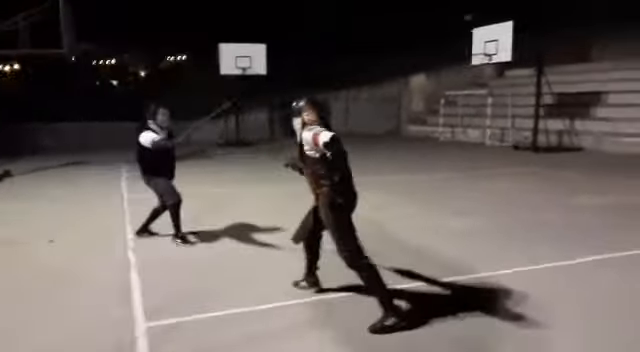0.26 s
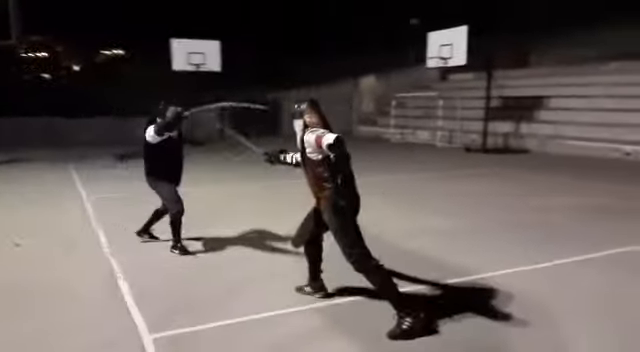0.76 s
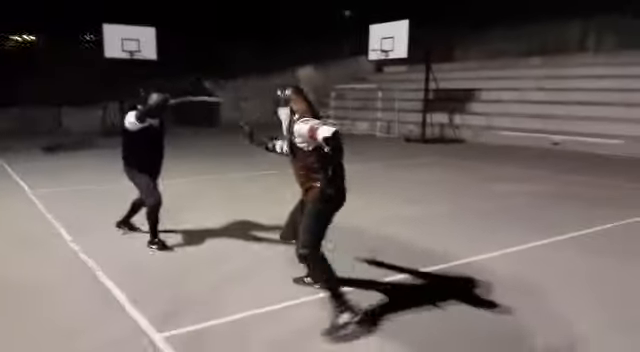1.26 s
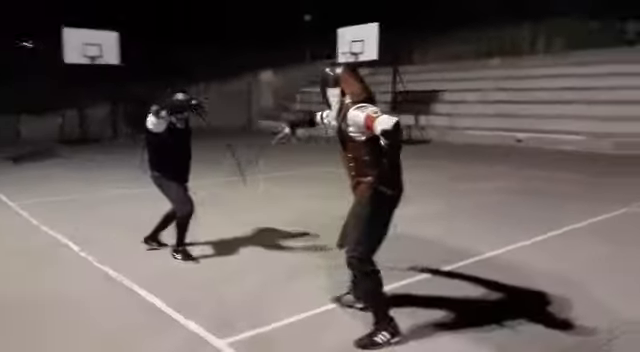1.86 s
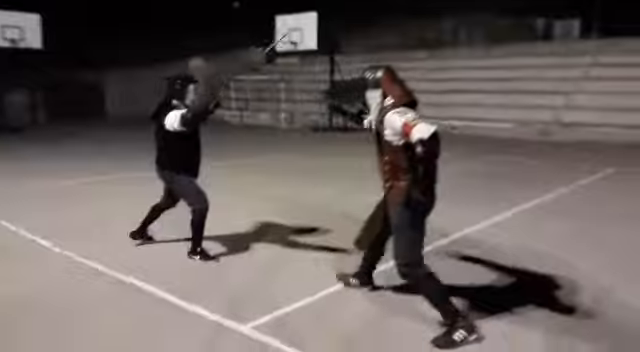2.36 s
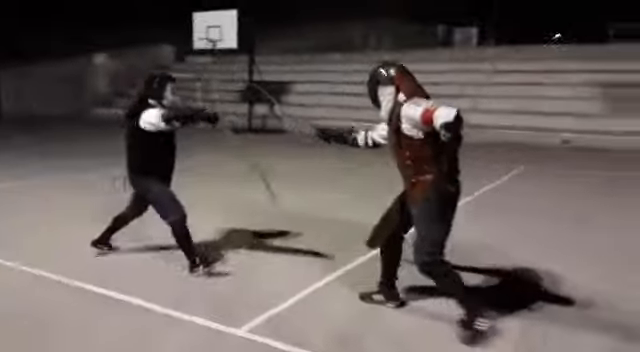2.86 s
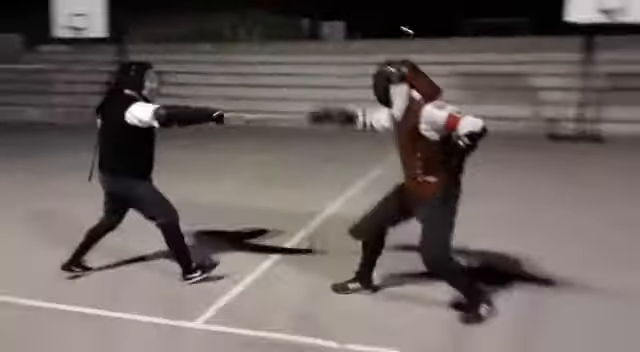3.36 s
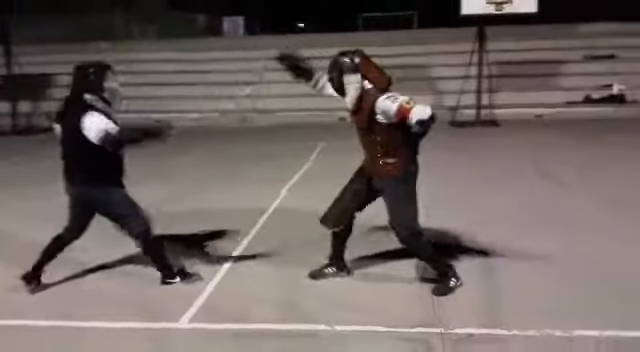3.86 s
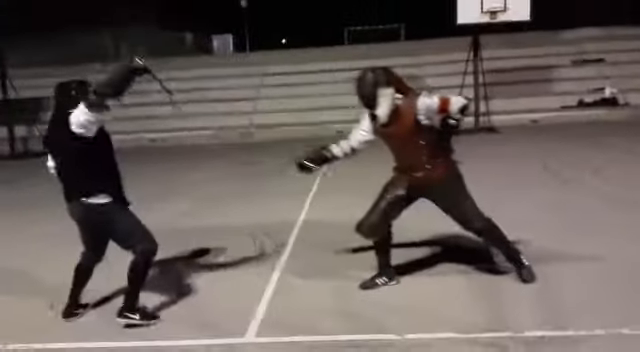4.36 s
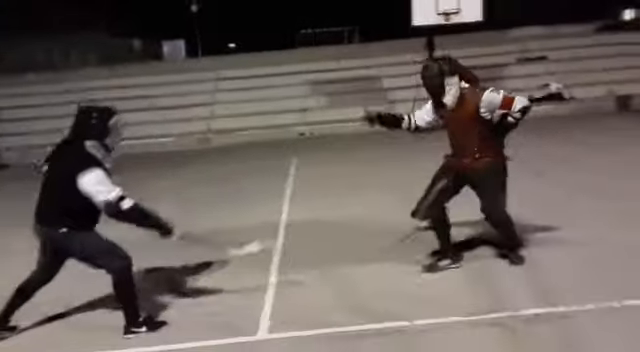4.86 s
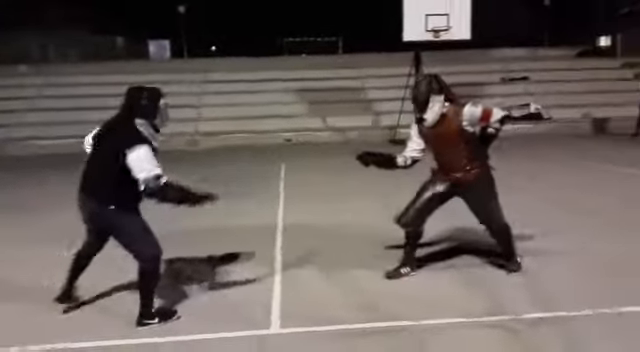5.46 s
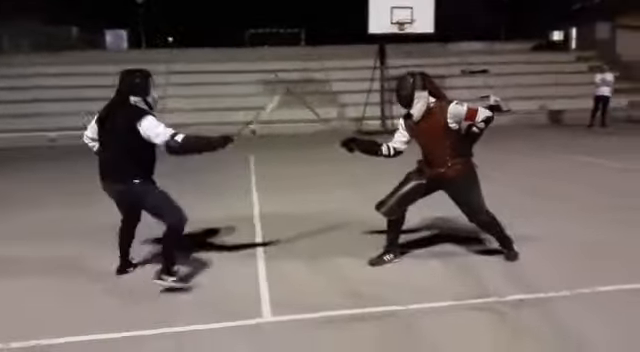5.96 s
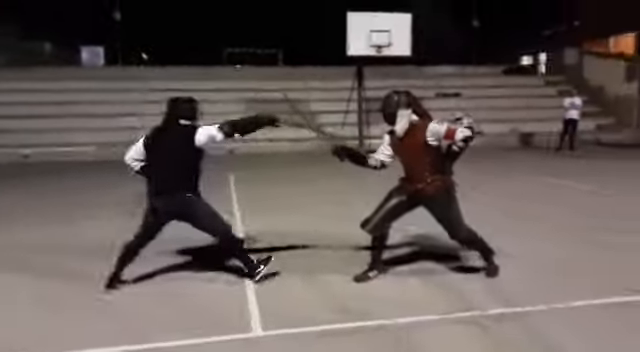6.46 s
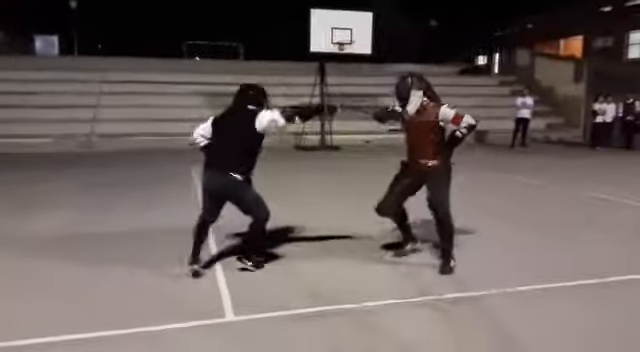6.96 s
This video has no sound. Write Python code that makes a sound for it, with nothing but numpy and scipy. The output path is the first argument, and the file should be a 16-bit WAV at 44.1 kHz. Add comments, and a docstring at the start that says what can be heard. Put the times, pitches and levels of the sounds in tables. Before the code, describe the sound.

Two steel sabres clash in bright ringing clinks and short scraping slides, with light shoe thuds on a concrete court at night.

```python
"""An outdoor concrete court at night: two fencers spar with steel sabres over a faint town rumble.
The blades clash and bounce as bursts of many damped modes, ring on in a few long ones, and slide as
tiny impacts that keep the steel ringing; squeals are wavering tones with overtones.
Shoes thud and slap, scrapes cross the ground, all as coloured noise; the concrete returns a thin tail.
The left microphone faces the blades and is limited and clipped on hard blows; the right one is shaded."""
import sys
import numpy as np
from scipy import signal
from scipy.fft import rfft, irfft, next_fast_len
from scipy.io import wavfile
from scipy.ndimage import uniform_filter1d, map_coordinates

SR = 44100
rng = np.random.default_rng(int(sys.argv[2]) if len(sys.argv) > 2 else 0)


def materialize(psi):
    """Save the field psi as 16-bit PCM at rate SR to the path in sys.argv[1].

    A 1-D psi becomes a single channel; in a 2-D psi each row is a channel.
    """
    bounded = np.clip(np.atleast_2d(psi).T, -1, 1)
    quanta = np.round(bounded * 32767).astype(np.int16)
    wavfile.write(sys.argv[1], SR, quanta)


N = 317520
TIME = np.arange(N) / SR
TOP_HZ = 14400  # upper band limit

# blows of blade on blade: t/s, clash level/dB, contacts in quick succession,
# ring level/dB, mode that the contact point favours f/Hz
BLOWS = [(1.395, -2, 2, -38, 6685), (1.463, -17, 1, -47, 6685), (1.614, -13, 1, -42, 5394),
         (1.868, -15, 1, -44, 7332), (2.2995, 4, 2, -34, 7332), (2.3715, -10, 1, -45, 7073),
         (2.539, -3, 1, -37, 8525), (2.654, -23, 1, -43, 5815), (3.126, 2, 1, -29, 5815),
         (3.201, -13, 1, -46, 7073), (3.519, -9, 1, -45, 5815), (3.6265, 6, 3, -41, 8525),
         (3.776, -13, 3, -46, 8040), (4.2035, 8, 2, -38, 5815), (4.339, -5, 1, -43, 8040),
         (5.1, -16, 1, -40, 6228), (5.691, 2, 1, -28, 5394), (5.853, -24, 1, -50, 7332),
         (5.956, -11, 1, -43, 7332), (6.232, -29, 1, -54, 3111), (6.634, -19, 1, -46, 6685),
         (6.716, -22, 1, -40, 3111)]
# long-ringing modes of the two sabres: f/Hz, relative level/dB, t60/s
SABRE_MODES = [(1200, -7, 0.2), (1668, -10, 0.5), (1810, -24, 0.2), (1995, -10, 0.71), (3111, -14, 0.21),
               (4190, -12.5, 0.45), (4530, -5.5, 0.17), (5394, 0.5, 0.42), (5815, -4, 0.65),
               (6685, 0.5, 0.32), (6570, -3, 0.55), (7073, -2, 0.45), (7360, 4, 0.15), (8040, -2, 0.21),
               (8500, 5.5, 0.12), (9571, -12.5, 0.31), (10100, -9.5, 0.24)]
# colour of steel scraping on steel: f/Hz, relative level/dB
SCRAPE_COLOUR = [(1000, -23.5), (2400, -12), (3200, -6.5), (4400, -8), (5500, 1), (6800, -1), (8500, -8.5),
                 (10000, -11.5), (11800, -24), (14000, -38.5)]
# colour of a dull thud, under blows and for slapping soles: f/Hz, relative level/dB
THUD_COLOUR = [(15, -30.5), (30, -14), (90, -4), (160, -2.5), (320, -4), (500, -9.5), (950, 3.5),
               (1800, -8.5), (4000, -24)]


def amp(db):
    """Decibels to gain."""
    return 10 ** (np.asarray(db) / 20)


def unit(x):
    """Scale to rms 1."""
    return x / np.sqrt(np.mean(x ** 2) + 1e-20)


def fade(t, t60):
    """Exponential decay by 60 dB in t60 seconds."""
    return np.exp(-np.log(1000) * t / np.maximum(t60, 1e-3))


def along(points, hz):
    """Read (Hz, value) points on a log frequency axis."""
    f, v = np.transpose(points)
    return np.interp(np.log(hz + 1), np.log(f + 1), v)


def filtered(x, response):
    """Apply a response, given as a function of frequency."""
    n = x.shape[-1]
    padded = next_fast_len(n + 4096)  # room for the filter's tail
    spectrum = rfft(x, padded) * response(np.fft.rfftfreq(padded, 1 / SR))
    return irfft(spectrum, padded)[..., :n]


def tinted(x, colour):
    """x with its spectrum shaped by the colour, at rms 1."""
    return unit(filtered(x, lambda hz: amp(along(colour, hz))))


def wobble(rate, n=N):
    """A smooth random curve with rate knots a second."""
    knots = rng.standard_normal(int(n * rate / SR) + 4)
    return map_coordinates(knots, [np.arange(n) * rate / SR])


def add(track, s, sound):
    """Mix a sound into the track at time s."""
    room = track[max(round(s * SR), 0):][:len(sound)]
    room += sound[:len(room)]


def patchy(x, depth_db, size=(3, 9)):
    """Small patches of the spectrum, size in bins and frames, swell and fade on their own."""
    z = signal.stft(x, nperseg=512)[2]
    across_bins = uniform_filter1d(rng.standard_normal(z.shape), size[0], 0)
    field = unit(uniform_filter1d(across_bins, size[1], 1))
    return unit(signal.istft(z * amp(depth_db * field), nperseg=512)[1][:len(x)])


def grains(rate):
    """Tiny random impacts of very unequal size, rate a second on average."""
    return unit((rng.random(N) < rate / SR) * rng.standard_normal(N))


def ringing(modes, t, scatter_db):
    """Damped modes; their strengths depend on where the blade is touched."""
    hz, db, t60 = np.transpose(modes)[:, :, None]
    gain = amp(db + scatter_db * rng.standard_normal(hz.shape))
    tones = np.sin(2 * np.pi * (hz * t + rng.random(hz.shape)))
    return np.sum(gain * fade(t, t60) * tones, 0)


def overtones(count=120):
    """The crowd of weaker bending and twisting modes of blades and guards (Hz)."""
    return np.linspace(1100, TOP_HZ, count) + rng.uniform(-55, 55, count)


def clashes(crowd, noise_share=1.0, rise_s=0.00096, focus_db=5, focus_hz=900):
    """Edges chatter for a moment, throwing all the modes into a burst that the grip soon damps."""
    # colour of the clashing edges: f/Hz, relative level/dB
    clash_colour = [(40, -60.5), (300, -50.5), (800, -15.5), (1200, -3.5), (1800, -8), (3200, -1),
                    (4400, -3), (5500, 2), (6800, 7.5), (8500, 1), (10000, -3), (11800, -7), (14000, -19.5)]
    rebound_s, rebound_loss_db = .013, 7.5  # the edges meet again after this time, weaker each time
    clash_t60_s, thud_t60_s = .08, 0.083
    thud_db, thud_grows = -24, 1.6  # low thud under a blow of 0 dB; its dB per dB of the blow
    t, out = TIME[:SR // 5], np.zeros(N)
    waves = np.exp(2j * np.pi * crowd[:, None] * t)
    attack = 1 - np.exp(-t / rise_s)
    contacts = [(s + k * rebound_s, db - k * rebound_loss_db, favoured)
                for s, db, count, _, favoured in BLOWS for k in range(round(count))]
    for s, db, favoured in contacts:
        # modes near the favoured one take most of the blow
        focus = amp(focus_db * np.exp(-((crowd - favoured) / focus_hz) ** 2))
        chance = rng.standard_normal(len(crowd)) + 1j * rng.standard_normal(len(crowd))
        modes = unit(((focus * chance) @ waves).real)
        burst = modes + noise_share * rng.standard_normal(len(t))
        add(out, s, amp(db) * tinted(burst, clash_colour) * attack * fade(t, clash_t60_s))
        # a dull low thud underneath, strongest in hard blows
        thud = tinted(rng.standard_normal(len(t)), THUD_COLOUR) * attack * fade(t, thud_t60_s)
        add(out, s, amp(thud_db + thud_grows * db) * thud)
    return out


def rings():
    """After each blow the sabres sing on, most of all in the mode that bends at the contact point."""
    # extra ring of the favoured mode; how far it reaches to neighbouring modes
    favour_db, favour_reach_hz = 14, 170
    t, out = TIME[:int(SR * .7)], np.zeros(N)
    for s, _, _, ring_db, favoured in BLOWS:
        modes = [(hz, db + favour_db * np.exp(-((hz - favoured) / favour_reach_hz) ** 2), t60)
                 for hz, db, t60 in SABRE_MODES]
        # each mode varies from blow to blow
        add(out, s, amp(ring_db) * ringing(modes, t, scatter_db=3.5))
    return out


def shimmer(flicker_db=4):
    """A few very high tones swell quickly and flicker as they die away."""
    # thin, very high tones that ring briefly: t/s, f/Hz, t60/s, level/dB
    high_tones = [(4.205, 12966, 0.19, -5), (4.205, 13800, 0.25, -29), (6.42, 13630, 0.93, -34),
                  (6.5, 12900, 0.43, -36)]
    t, out = TIME[:SR // 2], np.zeros(N)
    for s, hz, t60, db in high_tones:
        drift_hz = 12 * wobble(60, len(t))
        drift = 2 * np.pi * np.cumsum(drift_hz) / SR
        flicker = unit(amp(flicker_db * wobble(30, len(t))))
        tone = np.sin(2 * np.pi * hz * t + drift) * flicker
        add(out, s, amp(db) * signal.windows.tukey(len(t), .04) * fade(t, t60) * tone)
    return out


def pressure():
    """Gains of blade and guard: each slide bites, presses harder or eases off steadily, then lets go."""
    # edges that stay together and slide: t/s, length/s, first level/dB,
    # change of pressure along the way/dB, hand guard against blade/dB
    slide_contacts = [(1.442, 0.16, -23, -6, -18), (1.615, 0.24, -30.5, 7.5, -17),
                      (2.34, 0.2, -27.5, -8.5, -18), (2.552, 0.046, -23.5, -7.5, -11.5),
                      (2.61, 0.067, -35.5, -3.5, -3.5), (3.12, .22, -23.5, -15.5, -10),
                      (3.38, 0.15, -45, 11, 0), (3.67, 0.28, -23.5, -13, -16.5),
                      (4.236, 0.16, -19.5, -11, -14), (5.112, 0.22, -16, -23.5, -19.5),
                      (5.707, .19, -20.5, -16, -24.5), (5.948, 0.14, -32, 3, -11),
                      (6.21, .29, -40.5, 15, -9.5), (6.63, 0.29, -32, -4.5, -1.5),
                      (7.10, 0.14, -60.5, 5.5, 13)]
    bite_s, release_db_per_s = .012, 142  # how fast the edges catch; how fast they quieten once parted
    # guard dB per dB of pressure change; it fades as the contact runs toward the tip
    guard_follows, guard_sag_db_per_s = 1, 19.5
    blade, guard, t = np.zeros(N), np.zeros(N), TIME[:SR]
    for s, length, db, change_db, guard_db in slide_contacts:
        bite = 1 - np.exp(-t / bite_s)
        contact = bite * amp(db - release_db_per_s * np.maximum(t - length, 0))
        press_db = change_db * np.minimum(t / length, 1)
        add(blade, s, contact * amp(press_db))
        add(guard, s, contact * amp(guard_db + guard_follows * press_db - guard_sag_db_per_s * t))
    return blade, guard


def slide(crowd, song_db=-10, rasp_db=-5, judder_db=1.52):
    """Nicks in one edge catch on the other and keep the steel ringing."""
    # colour of the hand guards: f/Hz, relative level/dB
    guard_colour = [(200, -20.5), (500, -6), (800, -2), (1200, -2.5), (1450, -8), (1750, -6), (2200, -6),
                    (3000, -10), (6000, -26.5)]
    blade_gain, guard_gain = pressure()
    nicks, t = grains(rate=4000), TIME[:SR // 3]

    def excite(modes):
        """The nicks set these modes ringing."""
        return unit(signal.fftconvolve(nicks, ringing(modes, t, scatter_db=0))[:N])

    crowd_modes = [(hz, 0, .11) for hz in crowd]  # f/Hz, level/dB, t60/s
    steel = excite(crowd_modes) + amp(rasp_db) * nicks
    # as the contact point travels, neighbouring partials swell and fade
    steel = patchy(steel, depth_db=4)
    song = amp(song_db) * excite(SABRE_MODES)
    blade = unit(tinted(steel, SCRAPE_COLOUR) + song) * blade_gain
    guard = tinted(steel, guard_colour) * guard_gain
    return (blade + guard) * amp(judder_db * wobble(110))


def squeals(second_db=-6, third_db=-14, rasp=0.34):
    """Stick and slip lock briefly into an unsteady pitch that tends to rise."""
    # stick-slip squeals: t/s, middle pitch f/Hz, length/s, level/dB
    stick_slips = [(0.883, 2162, 0.075, -31.5), (1.928, 2740, 0.03, -37.5), (4.042, 3225, 0.1, -45.5),
                   (4.173, 1880, 0.036, -26.5), (4.168, 3650, 0.022, -28.5), (4.253, 1770, 0.012, -30),
                   (6.706, 3220, 0.035, -20.5), (6.713, 3304, 0.54, -70)]
    out = np.zeros(N)
    for s, hz, length, db in stick_slips:
        n = int(length * SR)
        waver_hz = 150 * wobble(700, n)
        pitch = hz * np.linspace(.975, 1.025, n) + waver_hz
        phase = 2 * np.pi * np.cumsum(pitch) / SR
        tone = np.sin(phase) + amp(second_db) * np.sin(2 * phase) + amp(third_db) * np.sin(3 * phase)
        rough = rasp * tinted(rng.standard_normal(n), SCRAPE_COLOUR)
        add(out, s, amp(db) * unit(np.hanning(n) * (tone + rough)))
    return out


def feet():
    """Soft soles thud on the court, with further shuffling steps between; a flat landing slaps."""
    # footfalls: t/s, level/dB
    footfalls = [(0.443, -42.5), (0.541, -40.5), (1.087, -39), (1.251, -41.5), (1.835, -43.5),
                 (2.903, -41.5), (3.264, -43.5), (4.067, -38.5), (4.115, -39), (4.808, -46), (5.078, -41),
                 (5.152, -44.5), (6.638, -43), (6.757, -34.5)]
    # dull slaps of soles and padding: t/s, level/dB
    dull_slaps = [(3.489, -33), (4.911, -47.5), (6.338, -43.5), (6.944, -40), (7.097, -40)]
    # colour of soft soles on concrete: f/Hz, relative level/dB
    sole_colour = [(25, -20.5), (80, -9.5), (200, 6), (320, -2), (500, -23), (1500, -21.5), (6000, -45.5)]
    # further steps at random moments, one in each gap, at a common level, once the footwork quickens
    shuffle_start_s, shuffle_gap_s, shuffle_db = 2.9, 0.33, -42.5
    t, out = TIME[:SR // 4], np.zeros(N)
    shuffle = [(s + shuffle_gap_s * rng.random(), shuffle_db)
               for s in np.arange(shuffle_start_s, N / SR, shuffle_gap_s)]
    step_shape = (1 - np.exp(-t / 0.0041)) * fade(t, 0.11)
    for s, db in footfalls + shuffle:
        add(out, s, amp(db) * tinted(rng.standard_normal(len(t)), sole_colour) * step_shape)
    for s, db in dull_slaps:
        add(out, s, amp(db) * tinted(rng.standard_normal(len(t)), THUD_COLOUR) * fade(t, 0.091))
    return out


def scuffs(fall_db=-6):
    """Grit is dragged over concrete; each stroke bites, then eases off."""
    # strokes of shoes or a blade tip scraping over concrete: t/s, length/s, level/dB
    ground_strokes = [(1.162, 0.065, -59.5), (1.24, 0.055, -65), (2.103, 0.099, -42), (2.856, 0.089, -39),
                      (4.765, 0.3, -38), (4.822, 0.045, -33.5), (7.082, 0.024, -41.5)]
    # colour of grit on concrete: f/Hz, relative level/dB
    grit_colour = [(200, -13), (700, -2), (2000, -4.5), (5000, 6.5), (6300, 5), (7700, 12), (10000, 0.5),
                   (14000, -14)]
    stroke = np.zeros(N)
    for s, length, db in ground_strokes:
        n = int(length * SR)
        easing = amp(db + fall_db * np.linspace(-.5, .5, n))
        add(stroke, s, easing * signal.windows.tukey(n, .45))
    grit = patchy(grains(rate=5800), depth_db=3.5)
    return stroke * tinted(grit, grit_colour) * amp(1.2 * wobble(84))


def taps():
    """Each tap is one short push of air, with a weaker pull after it and no ring."""
    # small dry taps close to the microphones: t/s, peak level/dB
    close_taps = [(1.355, -37.5), (4.7554, -23)]
    width_s = 0.00078  # from the peak to the zero crossing
    u, out = TIME[:SR // 100] / width_s, np.zeros(N)
    for s, db in close_taps:
        add(out, s, amp(db) * (1 - u) * np.exp(-u))
    return out


def court(x):
    """The concrete stands return a thin, diffuse tail."""
    # reverberation of the court: f/Hz, t60/s
    court_decay = [(150, 0.76), (2000, 0.76), (7000, 0.79), (14000, 0.12)]
    hz, t, z = signal.stft(rng.standard_normal((2, SR)), SR, nperseg=256)
    build_up = 1 - np.exp(-t / 0.066)
    decaying = z * fade(t, along(court_decay, hz)[:, None]) * build_up
    tail = signal.istft(decaying, SR, nperseg=256)[1]
    return signal.fftconvolve(x[None], tail / np.linalg.norm(tail[0]), axes=1)[:, :N]


def town():
    """A low, slowly drifting rumble of coloured noise, nearly the same on both sides."""
    # colour of the distant town: f/Hz, relative level/dB
    town_colour = [(15, -52), (25, -14.5), (118, 0), (154, -4.5), (237, -15.5), (1000, -17.5),
                   (2430, -27.5), (13800, -38.5), (15000, -56)]
    noise = rng.standard_normal(N) + 0.16 * rng.standard_normal((2, N))
    return amp(-61 + 0.92 * wobble(1.4)) * tinted(noise, town_colour)


def microphones(x, lag_s=0.00063, scatter=3.1, count=3):
    """Sound reaches the right port later, partly along scattered paths that shift as the fencers move."""
    # the right microphone against the left: f/Hz, level/dB
    right_shade = [(250, 0.5), (800, -8.5), (1200, -4), (1800, 0), (2400, -7.5), (3200, -16), (4400, -14.5),
                   (5500, -21), (6800, -24.5), (8500, -23), (10000, -20.5), (11300, -9.5), (13000, 0.5)]
    t = TIME[:SR // 50]
    bounces = rng.standard_normal((count, len(t))) * fade(t, 0.02)
    paths = signal.fftconvolve(x[None], bounces / np.linalg.norm(bounces[0]), axes=1)[:, :N]
    shares = np.array([wobble(6) for _ in paths])
    scattered = np.sum(shares * paths, 0) / np.linalg.norm(shares, axis=0)
    right = (x + scatter * scattered) / np.hypot(1, scatter)

    def shade_and_delay(hz):
        """Gain and lag of the right microphone."""
        return amp(along(right_shade, hz)) * np.exp(-2j * np.pi * hz * lag_s)

    return np.array([x, filtered(right, shade_and_delay)])


def scene():
    """Blades, footwork and the open court, as left and right channels."""
    crowd = overtones()
    blades = clashes(crowd) + rings() + slide(crowd) + shimmer()
    squeal, steps = squeals(), feet()
    # footfalls and taps reach both microphones alike
    direct = microphones(blades + squeal + scuffs()) + steps + taps()
    echo = court(amp(-45.0) * blades + amp(-13) * squeal + amp(-12.0) * steps)
    return direct + echo * amp([[0], [-5]]) + town()


def record(dry):
    """A fast limiter on each channel squeezes hard blows, their tips clip; a steep low-pass follows."""
    limit_db, window_s = -2, 0.0017  # rms ceiling; how fast the limiter reacts
    power = np.abs(uniform_filter1d(dry ** 2, max(int(window_s * SR), 1), axis=1))
    limited = dry / np.maximum(1, np.sqrt(power) / amp(limit_db))
    return filtered(np.clip(limited, -1, 1), lambda hz: 1 / np.sqrt(1 + (hz / TOP_HZ) ** 120))


dry = scene()
out = record(dry)
materialize(out)
```